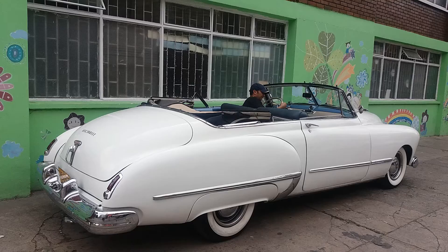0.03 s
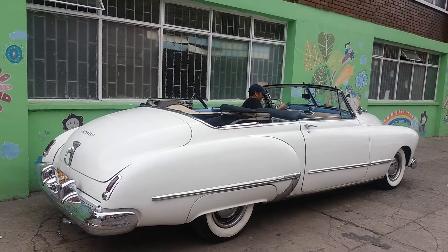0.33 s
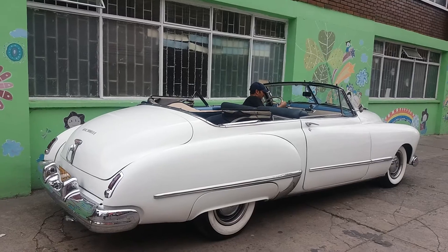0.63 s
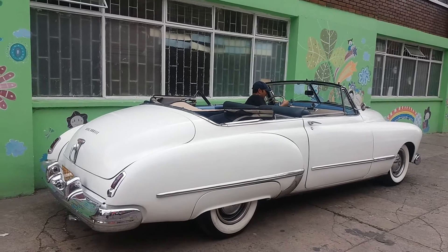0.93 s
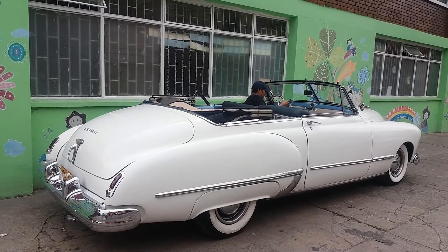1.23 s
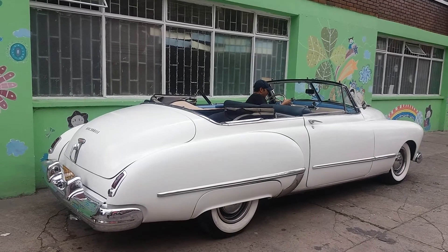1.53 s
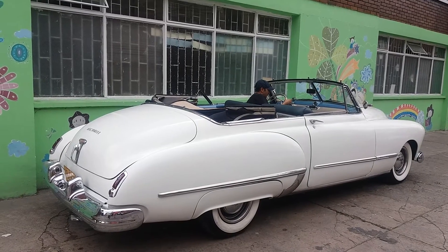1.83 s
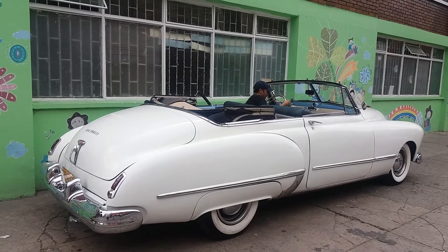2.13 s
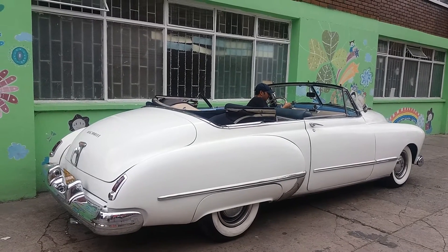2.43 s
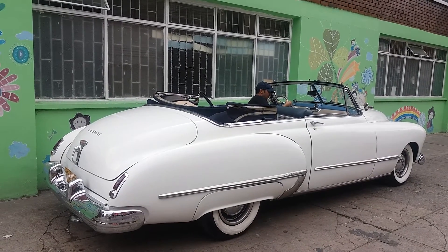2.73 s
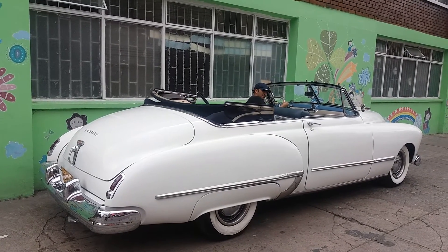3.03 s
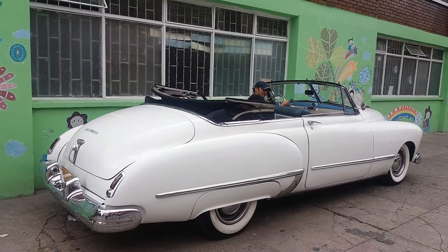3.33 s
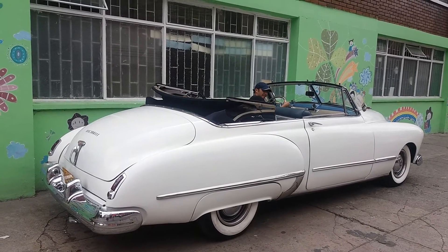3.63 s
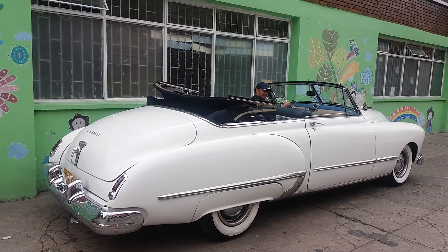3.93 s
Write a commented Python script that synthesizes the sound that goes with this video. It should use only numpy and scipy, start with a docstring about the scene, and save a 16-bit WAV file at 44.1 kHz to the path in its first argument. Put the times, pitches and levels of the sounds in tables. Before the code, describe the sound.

A convertible's power top whines and dies away over an idling engine and traffic rumble.

```python
"""On a street, beside a wall: one microphone a few metres from an old convertible as its power top moves.
The sound fades in on the loping hum and clatter of the idling engine, over rumbling traffic.
The top's electric motor whines up, sags five times under its load, slows and dies away.
The frame rasps, ticks and bumps, and something turning squeaks about once a second.
The wall throws back the whine, ticks and squeaks; the engine hums on."""
import sys
import numpy as np
from scipy import signal
from scipy.fft import rfft, irfft
from scipy.io import wavfile

SR = 44100
rng = np.random.default_rng(int(sys.argv[2]) if len(sys.argv) > 2 else 0)


def output_pcm(signal):
    """Save a mono or channel-first signal as 16-bit PCM at the path in sys.argv[1].

    Samples are clipped to [-1, 1] before scaling.
    """
    pcm = np.clip(np.atleast_2d(signal).T, -1, 1) * 32767
    wavfile.write(sys.argv[1], SR, np.round(pcm).astype(np.int16))


N = 176400
T = np.arange(N) / SR


def from_db(db):
    """Decibels to gain."""
    return 10 ** (np.asarray(db) / 20)


def unit_rms(x):
    """Scale to unit power."""
    return x / np.sqrt(np.mean(x ** 2) + 1e-20)


def curve(rows, column=1):
    """One column of a table, interpolated over the times in its first column."""
    columns = np.transpose(rows)
    return np.interp(T, columns[0], columns[column])


def drift(rate_hz):
    """A smooth random wander with spread 1, mostly slower than rate_hz."""
    step, settle = 40, 2000
    pole = np.exp(-2 * np.pi * rate_hz * step / SR)
    white = rng.standard_normal(N // step + settle + 2)
    slow = signal.lfilter([1], [1, -2 * pole, pole * pole], white)[settle:]
    return np.interp(np.arange(N) / step, np.arange(len(slow)), unit_rms(slow))


def tone(hz, db):
    """A sine that follows a pitch and an rms level."""
    return np.sqrt(2) * from_db(db) * np.sin(2 * np.pi * (np.cumsum(hz) / SR + rng.random()))


def noise(spectrum):
    """Noise of a given colour, falling steeply below its lowest point; rms 1."""
    hz, db = np.transpose(spectrum)
    bins_hz = np.maximum(np.fft.rfftfreq(N, 1 / SR), 1)
    colour = from_db(np.interp(np.log(bins_hz), np.log(hz), db))
    low_cut = np.minimum(bins_hz / hz[0], 1) ** 4
    return unit_rms(irfft(rfft(rng.standard_normal(N)) * colour * low_cut, N))


# Idle speed of the car, a few metres off: time_s, firing_hz
FIRING_RATE = [(.42, 42.8), (1.0, 43.05), (1.7, 43.05), (2.1, 42.75), (2.6, 42.4), (4, 42.35)]
# Exhaust tones: firing_multiple, level_db
EXHAUST_TONES = [(3, -33.5), (3.25, -49), (3.5, -55), (4.25, -55.5), (5, -51), (6, -52), (7, -48),
                 (8.25, -55.5), (9.5, -58), (16.5, -56.5), (21, -53), (23, -66.5)]
# Swell of all but the loudest of them: time_s, gain_db
OVERTONE_GAIN = [(.42, 1.5), (1.2, 2), (1.6, -0.5), (2.3, 1), (3.2, 0), (3.6, -3), (4, -4.5)]
# Colour of the engine's clatter: frequency_hz, relative_db
CLATTER_SPECTRUM = [(100, -4), (170, -1), (294, -0.5), (369, -5.5), (405, -2), (445, -6.5), (538, -9.5),
                    (650, -8), (714, -6.5), (800, -5), (879, -6), (1100, -8), (1940, -11.5), (2390, -16.5),
                    (3060, -26.5), (3830, -26.5), (4720, -24), (6380, -36.5), (15500, -49)]
# Swell of the clatter: time_s, gain_db
CLATTER_GAIN = [(.42, 2.5), (1.1, 1.5), (2.0, 1), (2.5, 0.5), (3.2, 1), (3.6, 0), (4, 0)]
# Lope of the idle: firings_per_beat, hum_swing_db, clatter_swing_db
IDLE_LOPE = [(8, .6, .15), (4, 1.0, .25), (2, .5, .15)]


def engine():
    """Exhaust hum on multiples of the firing rate and mechanical noise, loping with the crankshaft."""
    firing_hz = curve(FIRING_RATE) * (1 + .0031 * drift(8.2))
    overtone_db = curve(OVERTONE_GAIN)
    loudest_db = max(db for _, db in EXHAUST_TONES)
    hum = 0
    for multiple, db in EXHAUST_TONES:
        waver_db = -.14 * drift(8) if db == loudest_db else overtone_db + 3 * drift(6.5)
        hum += tone(multiple * firing_hz, db + waver_db)
    clatter = from_db(-39 + curve(CLATTER_GAIN) + .24 * drift(8.5)) * noise(CLATTER_SPECTRUM)
    for firings, hum_swing_db, clatter_swing_db in IDLE_LOPE:
        beat = tone(firing_hz / firings, 0)
        hum *= from_db(hum_swing_db * beat)
        clatter *= from_db(clatter_swing_db * beat)
    return hum + clatter


# Colour of the street's rumble: frequency_hz, relative_db
RUMBLE_SPECTRUM = [(34, -24), (42, -4), (52, 6), (65, 12), (85, 9.5), (110, 9), (160, 2), (220, -0.5),
                   (290, -5.5), (380, -9), (500, -31), (1500, -74)]
# The rumble at the microphone: time_s, level_db
RUMBLE_LEVEL = [(.42, -36.5), (.9, -38.5), (1.12, -35), (1.2, -39.5), (1.75, -37.5), (2.4, -39.5),
                (3.0, -40.5), (3.44, -40.5), (3.54, -36.5), (3.65, -36), (4, -37)]
# Another engine in the street: time_s, pitch_hz, level_db
TRAFFIC_DRONE = [(.42, 59.5, -57), (1.0, 64.2, -39), (1.3, 64.5, -44), (1.58, 67.2, -42),
                 (1.72, 68.58, -33), (1.86, 68, -29), (2.0, 69.5, -37), (2.12, 72.1, -38.5),
                 (2.45, 76, -35), (2.75, 79.33, -40), (3.0, 81, -38), (3.4, 86.03, -44), (4, 90, -47)]


def traffic():
    """Low rumble, and the rising drone of another engine gathering speed."""
    pitch_hz = curve(TRAFFIC_DRONE) * (1 + .01 * drift(9))
    drone = tone(pitch_hz, curve(TRAFFIC_DRONE, column=2) + drift(10))
    return from_db(curve(RUMBLE_LEVEL)) * noise(RUMBLE_SPECTRUM) + drone


def street_hiss():
    """The faint, even, high hiss of the street."""
    return from_db(-67) * noise([(6000, -2), (10000, 0), (15500, -2.2)])


# The top's rasp at the microphone: time_s, level_db
RASP_LEVEL = [(.42, -52), (1.9, -52), (2.3, -48), (2.7, -55.5), (3.2, -50.5), (3.45, -49.5), (3.6, -57.5),
              (4, -51)]
# Its colour: frequency_hz, relative_db
RASP_SPECTRUM = [(1400, -9.5), (2300, 2), (2650, -6), (3100, -21), (4500, -12), (6500, -24.5), (10000, -41)]


def frame_rasp():
    """A soft rubbing as the frame of the top unfolds."""
    return from_db(curve(RASP_LEVEL) + 2 * drift(25)) * noise(RASP_SPECTRUM)


def wall_reflections(sound, t60_s=.58, delay_s=.0054):
    """Scattered reflections reaching the microphone from wall, pavement and bodywork."""
    t = T[:SR // 2]
    tail = rng.standard_normal(len(t)) * from_db(-60 * t / t60_s) * (t > delay_s)
    return signal.fftconvolve(sound, tail / np.sqrt(np.sum(tail ** 2)))[:N]


# Whine of the top's motor, before the sags: time_s, pitch_hz
WHINE_PITCH = [(.5, 715), (.6, 760), (.68, 790), (.78, 805), (.9, 817), (1.0, 821), (1.15, 819), (1.4, 815),
               (1.58, 813), (1.66, 807), (1.78, 792), (1.95, 780), (2.08, 764), (2.3, 738)]
# The load catches: deepest_s, drop_hz
LOAD_SAGS = [(1.041, 22.4), (1.179, 30), (1.32, 30.7), (1.451, 21), (1.59, 7)]
# The whine's three lowest partials, surging and fading as heard beside the wall: time_s, level_db
FIRST_PARTIAL = [(.5, -54), (.65, -38.5), (.8, -44), (.98, -35.5), (1.08, -42), (1.3, -36.5), (1.5, -39.5),
                 (1.61, -43.5), (1.74, -33.5), (1.85, -34), (1.96, -33), (2.05, -32.5), (2.14, -52),
                 (2.27, -43), (2.42, -63)]
SECOND_PARTIAL = [(.55, -68), (.65, -46), (.95, -50), (1.07, -45), (1.135, -57), (1.17, -44), (1.24, -40),
                  (1.28, -54), (1.365, -37.5), (1.42, -50), (1.465, -37.5), (1.53, -40), (1.57, -50),
                  (1.61, -39), (1.7, -33), (1.78, -46), (1.85, -49), (1.89, -42), (1.96, -46),
                  (2.03, -38.5), (2.1, -56), (2.165, -42), (2.23, -58), (2.4, -70)]
THIRD_PARTIAL = [(.55, -75), (.7, -58), (.82, -53), (.9, -51), (1.01, -45), (1.07, -56), (1.13, -45.5),
                 (1.24, -57), (1.28, -42.5), (1.35, -61), (1.46, -44.5), (1.51, -62), (1.56, -43),
                 (1.61, -61), (1.67, -45), (1.8, -64), (1.9, -51), (2.05, -58), (2.3, -71)]
# Relative strengths of its upper partials: pitch_multiple, run_up_db, loaded_db, slowing_db
UPPER_PARTIALS = [(4, -68, -61, -64), (5, -68, -53, -63), (6, -60, -48.5, -63), (7, -59.5, -59, -61),
                  (8, -65, -66, -77.5), (9, -70, -63, -75), (10, -72, -68, -58), (11, -81, -81, -64),
                  (12, -68, -61.5, -72), (13, -77, -76, -65), (14, -85, -78, -64), (15, -87, -77, -76),
                  (16, -83, -71, -81), (17, -85, -80, -81), (18, -85, -85, -80), (19, -86, -76, -81)]
# Passing tones off the harmonic series: pitch_multiple, relative_db, peak_s, width_s
SIDE_TONES = [(.43, -41, .8, .18), (1.285, -39, 1.1, 0.071), (1.105, -61, 0.63, 0.23),
              (5.2, -53, 0.99, 0.071), (5.53, -64, 1.55, 0.29), (6.52, -58, 1.6, 0.27),
              (6.87, -60, 2.7, .4), (7.8, -63, 1.3, .4), (10.2, -75, 0.93, .4)]
# Swell of the upper partials and side tones: time_s, gain_db
TREBLE_GAIN = [(.42, -25), (.6, -7), (.72, -2), (1.0, -2), (1.4, -1), (1.7, -2.5), (1.9, -0.5), (2.1, -5),
               (2.22, -10), (2.4, -24), (2.7, -57)]
# Colour of the brush hiss: frequency_hz, relative_db
BRUSH_SPECTRUM = [(400, -10), (800, 11.5), (1300, -7), (2400, 5.5), (3100, -15), (4200, -3), (5600, -2.5),
                  (7000, -9.5), (8200, -8), (8900, -19), (10000, -8), (11500, -23.5), (14000, -26),
                  (15500, -32)]
# Swell of the brush hiss: time_s, gain_db
BRUSH_GAIN = [(.42, -18), (.6, -9), (.72, -6.5), (1.0, -2), (1.4, -0.5), (1.7, 0), (1.9, -2), (2.1, -3),
              (2.25, -14), (2.5, -16), (3.0, -17), (4, -30)]


def top_motor(sag_fall_s=.02, sag_recover_s=.045):
    """Rough partials on a speed that sags under load, with their wall reflections and brush hiss."""
    sag_hz = 0
    for deepest_s, drop_hz in LOAD_SAGS:
        fall = np.clip(1 + (T - deepest_s) / sag_fall_s, 0, 1)
        sag_hz += drop_hz * fall * np.exp(-np.maximum(T - deepest_s, 0) / sag_recover_s)
    pitch_hz = (curve(WHINE_PITCH) - sag_hz) * (1 + .0026 * drift(79))
    low = upper = 0
    for multiple, level in enumerate((FIRST_PARTIAL, SECOND_PARTIAL, THIRD_PARTIAL), 1):
        low += tone(multiple * pitch_hz, curve(level) + drift(17)) * (1 + .15 * drift(96))
    treble_db = curve(TREBLE_GAIN) - 2.5
    stages_s = (.62, 1.7, 2.04)  # run-up, under load, slowing
    for multiple, *stage_db in UPPER_PARTIALS:
        partial_hz = multiple * pitch_hz * (1 + .00135 * drift(76.5))
        partial = tone(partial_hz, np.interp(T, stages_s, stage_db) + treble_db)
        upper += partial * (1 + .48 * drift(100))  # fast flutter roughens the whine
    for multiple, db, peak_s, width_s in SIDE_TONES:
        swell = np.exp(-.5 * ((T - peak_s) / width_s) ** 2)
        upper += tone(multiple * pitch_hz, db + treble_db) * swell
    brush_hiss = from_db(-46.5 + curve(BRUSH_GAIN)) * noise(BRUSH_SPECTRUM)
    return low + upper + brush_hiss + wall_reflections(from_db(-18) * low + from_db(-3) * upper)


# Small ticks from the top's frame: start_s, pitch_hz, bandwidth_hz, level_db, decay_s
FRAME_TICKS = [(.875, 8000, 7000, -56, .005), (2.875, 3970, 3750, -46.5, .007), (2.94, 8500, 300, -54, .01)]


def frame_ticks():
    """Brief bursts of noise, each in one resonance of the frame."""
    out = 0
    for start_s, hz, bandwidth_hz, db, decay_s in FRAME_TICKS:
        radius = np.exp(-np.pi * bandwidth_hz / SR)
        resonance = [1, 0, -1, 1, -2 * radius * np.cos(2 * np.pi * hz / SR), radius * radius]
        ring = unit_rms(signal.sosfilt([resonance, resonance], rng.standard_normal(N)))
        out += from_db(db) * ring * (T > start_s) * np.exp(-np.abs(T - start_s) / decay_s)
    return out


# Squeaks of something turning: peak_s, pitch_hz, level_db, octave_db, roughness
TURNING_SQUEAKS = [(1.042, 1960, -43, -53, 0.63), (1.976, 1876, -39.5, -52.5, .6),
                   (2.29, 2070, -48, -54.5, 1.07), (2.913, 1882, -43, -53.5, 0.42),
                   (3.235, 2059, -45, -53, 1), (3.852, 1877, -41.5, -51.5, 0.36)]


def squeaks(width_s=.02, rise_hz_per_s=2200, octave_lag_s=.012):
    """Something turning gives short rising squeaks, clear or rough, each with its octave just behind."""
    out = 0
    for peak_s, hz, db, octave_db, roughness in TURNING_SQUEAKS:
        t = T - peak_s
        glide_hz = hz + rise_hz_per_s * np.clip(t, -.1, .1)
        pitch_hz = glide_hz * (1 + roughness * .045 * drift(203))
        out += tone(pitch_hz, db) * np.exp(-(t / width_s) ** 2)
        out += tone(2 * pitch_hz, octave_db) * np.exp(-((t - octave_lag_s) / width_s) ** 2)
    return out


# Low bumps from the folding frame: start_s, pitch_hz, level_db, decay_s
FRAME_BUMPS = [(1.09, 84.6, -29, 0.065), (3.519, 88, -26, 0.053), (3.75, 94.5, -29, 0.042)]


def frame_bumps():
    """Soft knocks that set a body panel booming for a few cycles."""
    out = 0
    for start_s, hz, db, decay_s in FRAME_BUMPS:
        attack = np.clip((T - start_s) * hz, 0, 1) ** 2  # one cycle long
        out += tone(np.full(N, hz), db) * attack * np.exp(-np.abs(T - start_s) / decay_s)
    return out


def scene():
    """Everything at one microphone beside the wall, a few metres from the car."""
    chatter = squeaks() + frame_ticks()
    mix = top_motor() + engine() + traffic() + frame_rasp() + frame_bumps() + street_hiss()
    return (mix + chatter + from_db(-5) * wall_reflections(chatter))[None]


# The microphone's channel fades up: time_s, gain_db
FADE_IN = [(.405, -102), (.42, -25), (.46, -15), (.52, -8.5), (.6, -4), (.7, 0)]


def record(dry, cutoff_hz=15800):
    """A fade-in from silence, then a steep low-pass on the highest treble."""
    faded = dry * from_db(curve(FADE_IN)) * (T > FADE_IN[0][0])
    return signal.sosfilt(signal.ellip(18, .1, 90, cutoff_hz, fs=SR, output="sos"), faded)


dry = scene()
out = record(dry)
output_pcm(out)
```